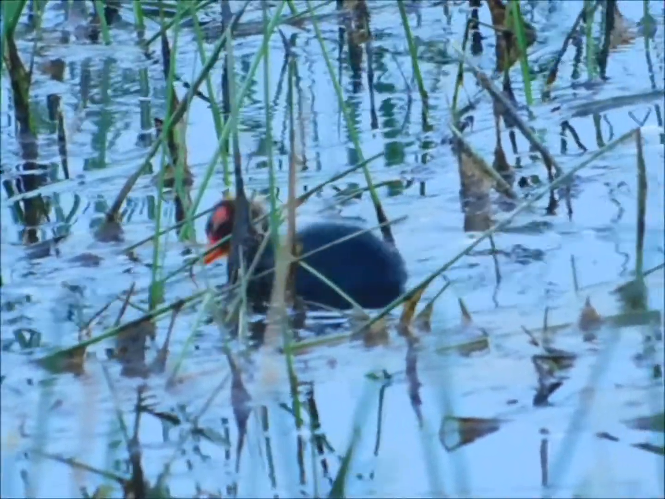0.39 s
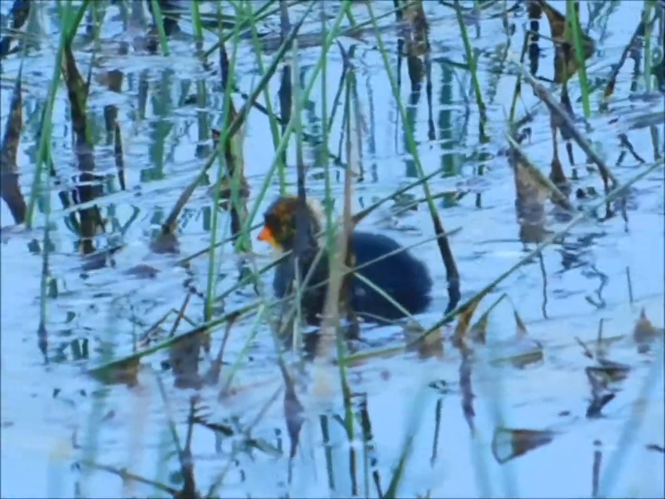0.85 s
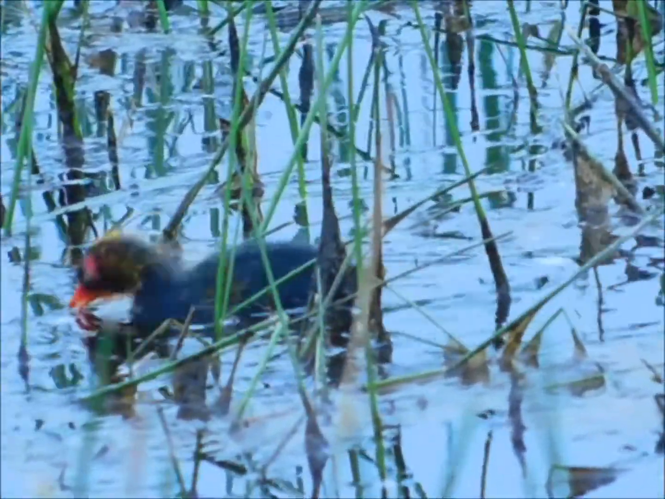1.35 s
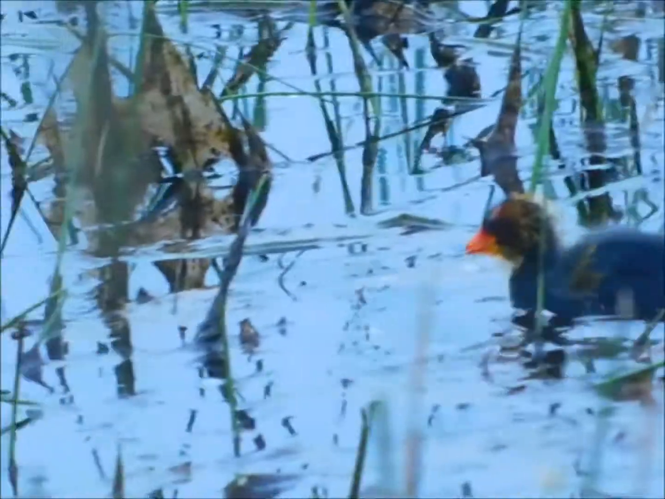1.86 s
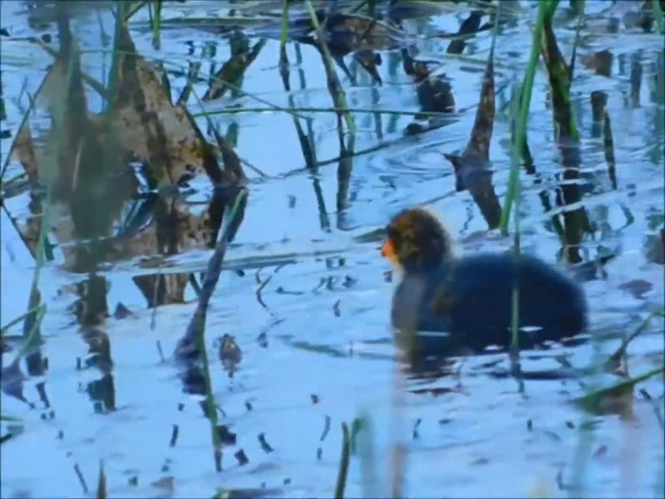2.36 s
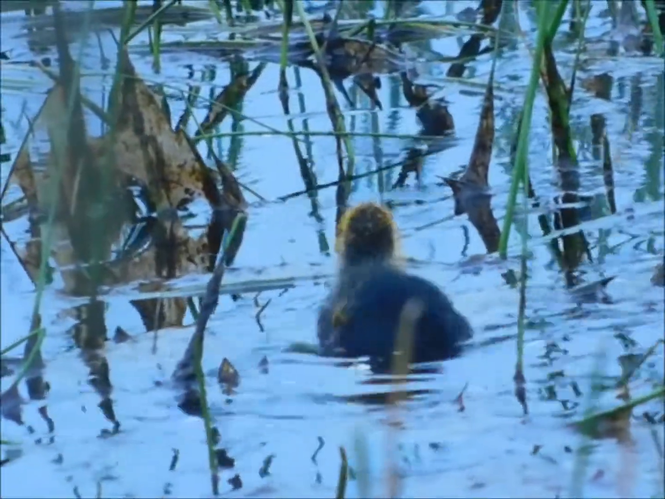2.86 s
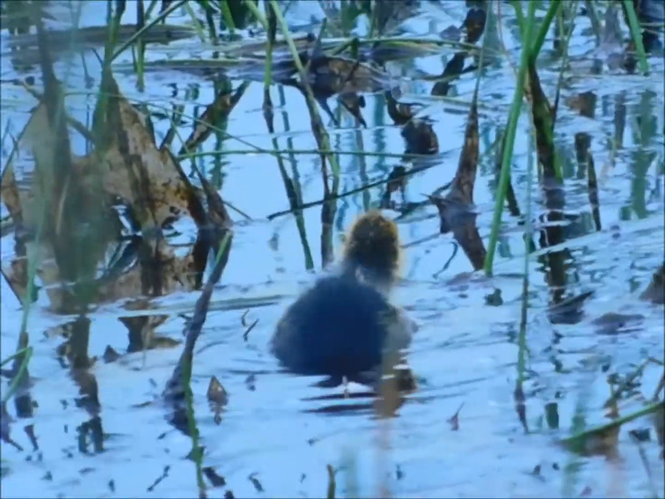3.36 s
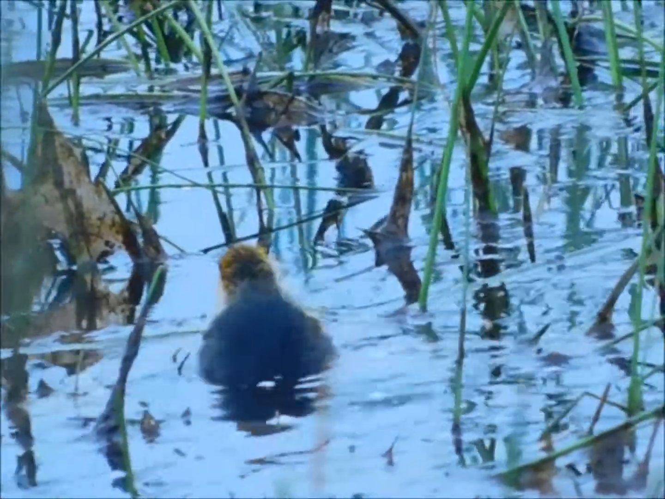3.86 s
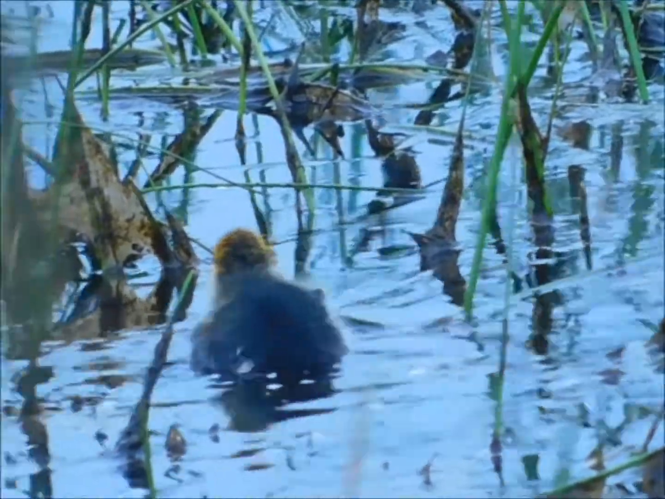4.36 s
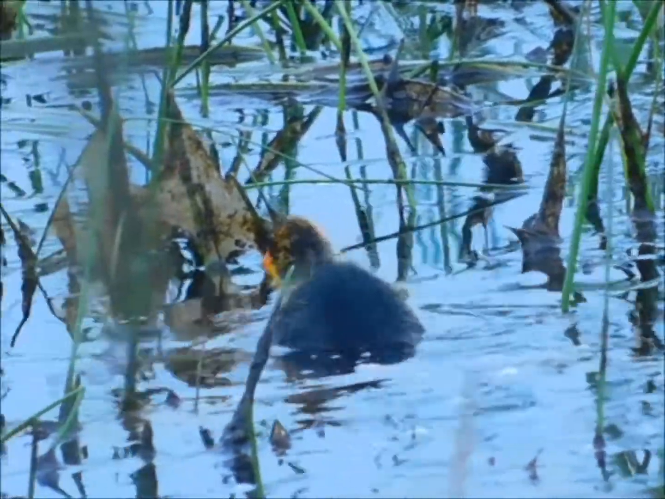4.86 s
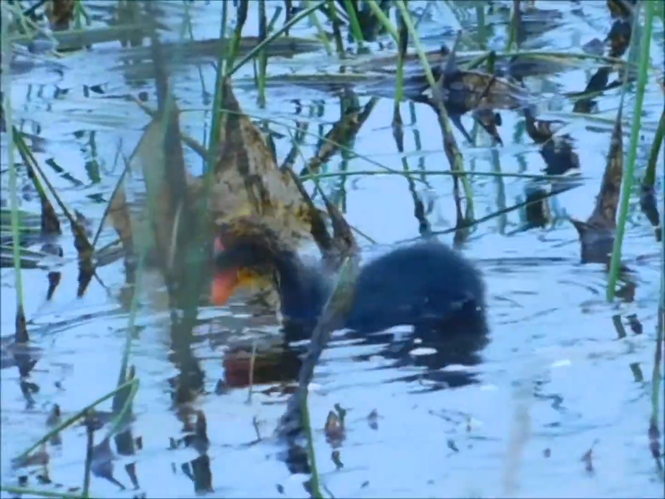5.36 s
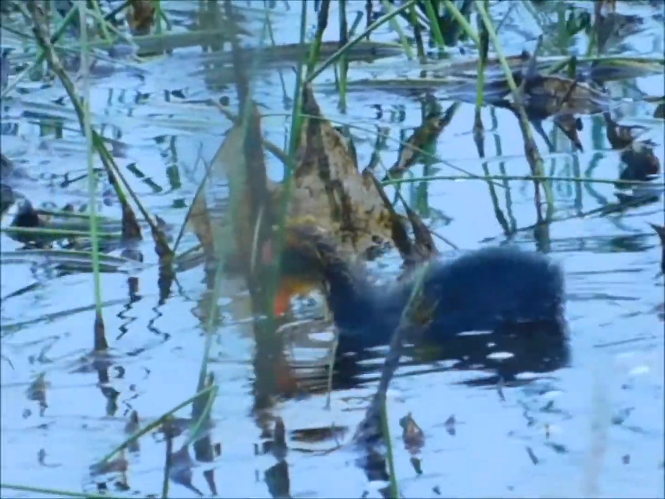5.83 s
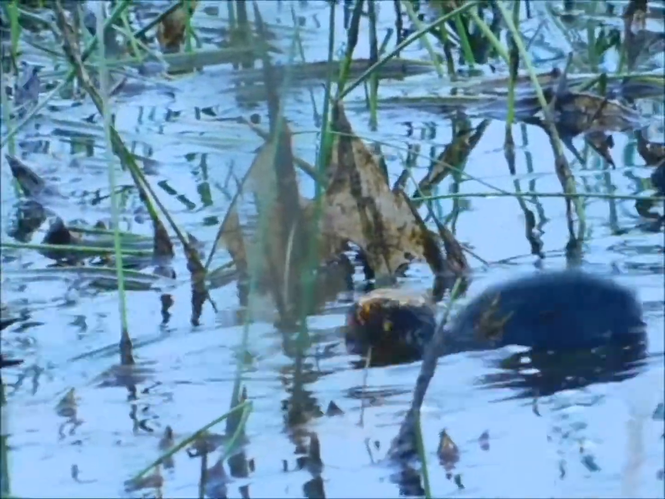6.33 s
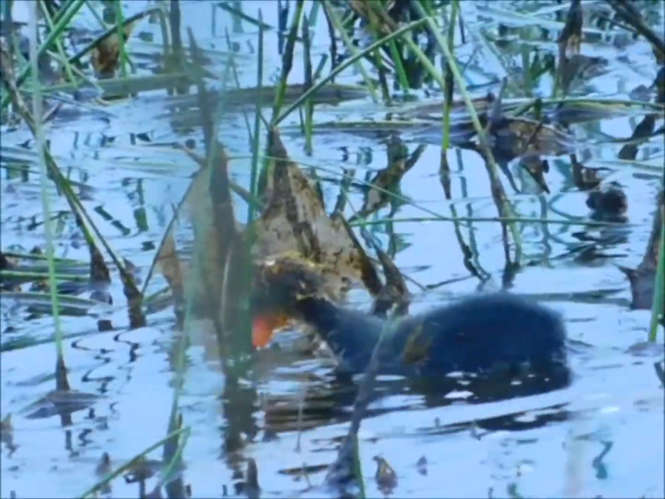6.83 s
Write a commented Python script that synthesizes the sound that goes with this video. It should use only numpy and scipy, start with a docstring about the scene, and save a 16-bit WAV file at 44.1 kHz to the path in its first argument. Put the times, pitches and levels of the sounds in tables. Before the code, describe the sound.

A young waterbird whistles high, arching peeps across open wetland, with brief buzzy and reedy adult calls, sharp close clicks and occasional bubbling plips.

```python
"""Waterbird chicks over a reed marsh

Chicks peep in gliding sines, thin and arching, while two grown birds give a buzzy and a reedy call. A far
chorus hums as narrow noise bands under an open-air hush of coloured noise. A small hard object on the right
clicks through ringing modes; puffs of filtered grains rustle on the left; soft dull taps and one low thud sound
as rising sines, and a faint high sine pip settles into a beat of six tenths of a second."""
import sys
import numpy as np
from scipy import signal
from scipy.fft import rfft, irfft
from scipy.io import wavfile
from scipy.ndimage import uniform_filter1d

SR = 44100
rng = np.random.default_rng(int(sys.argv[2]) if len(sys.argv) > 2 else 0)


def field_ratio(decibels):
    """Amplitude ratio for a level in dB (20 dB per decade); scalars and array-likes work."""
    return 10 ** (np.asarray(decibels, dtype=float) / 20)


def dump(signal):
    """Clip the signal to [-1, 1] and save it as 16-bit WAV at the path in sys.argv[1]."""
    limited = np.clip(np.atleast_2d(signal).T, -1, 1)
    pcm = np.round(limited * 32767).astype(np.int16)
    wavfile.write(sys.argv[1], SR, pcm)


N = 306934   # samples in the scene


def unit(x):
    """Scale to rms 1."""
    return x / np.sqrt(np.mean(x ** 2) + 1e-20)


def drift(rate_hz, size=N):
    """Slow random wander of rms 1: noise through two equal one-pole lowpasses."""
    r = np.exp(-2 * np.pi * rate_hz / SR)
    noise = rng.standard_normal(size + 4000)
    return unit(signal.lfilter([1], [1, -2 * r, r * r], noise)[4000:])   # drop the filter's start


def resonance(x, hz, width_hz):
    """Two-pole band with gain 1 on top."""
    r = np.exp(-np.pi * width_hz / SR)
    feedback = [1, -2 * r * np.cos(2 * np.pi * hz / SR), r * r]
    return signal.lfilter([(1 - r * r) / 2, 0, (r * r - 1) / 2], feedback, x)


def ring(clicks, hz, t60):
    """A unit click sets a decaying sine of starting height 1 ringing."""
    r, w = field_ratio(-60 / (t60 * SR)), 2 * np.pi * hz / SR
    return signal.lfilter([0, np.sin(w)], [1, -2 * r * np.cos(w), r * r], clicks + 1e-18)


def place(x, pan_db, lag):
    """Left-minus-right level, and a lag in samples of the left port behind the right."""
    left = field_ratio(pan_db / 2) * np.roll(x, lag)
    right = field_ratio(-pan_db / 2) * x
    return np.array([left, right])


def voice(rows, overtones, waver_db, flutter=0, haze=0):
    """A gliding stack of sines with rounded arches and soft ends, wavering in pitch and level.
    A fourth column (beats per s) chops it into pulses; haze is the noise share blurring partials over 3 kHz."""
    s, *columns = np.transpose(rows)
    at = np.arange(round(s[0] * SR), round(s[-1] * SR))
    size = len(at)
    longest = SR // 3   # samples in the longest call
    hz, db, *chop = [np.interp(at / SR, s, c) for c in columns]
    for _ in range(2):   # round the corners of the glide
        hz = uniform_filter1d(hz, size=1 + min(size // 10, 600), mode="nearest")
    wavering_hz = hz * (1 + .002 * drift(120, size=longest)[:size])
    phase = 2 * np.pi * np.cumsum(wavering_hz) / SR
    wavering_db = db + waver_db * drift(69, size=longest)[:size]
    soft_ends = signal.windows.tukey(size, min(1, 350 / size))
    level = np.sqrt(2) * field_ratio(wavering_db) * soft_ends
    if chop:
        beat = 2 * np.pi * np.cumsum(chop[0]) / SR
        level = level * unit(1 + flutter * np.sin(beat))
        phase = phase + .15 * np.cos(beat)   # each beat also bends the phase, in radians
    out = np.zeros(N)
    for k, gain_db in overtones:
        blur = 1
        if haze and k * hz.mean() > 3000:
            blur = np.sqrt(1 - haze) + np.sqrt(haze) * drift(780, size=longest)[:size]
        out[at] += level * field_ratio(gain_db) * blur * np.sin(k * phase + k * k)
    return out


# Colour of the open air, before scaling: (f/Hz, level/dB per Hz)
HUSH_COLOUR = [(12, -37), (20, -3), (65, -2.5), (237, -10.5), (583, -8), (670, -5.5), (1280, -7.5),
               (1900, -7), (2060, -6), (2660, -12), (4160, -20), (7300, -27), (12100, -29.5), (15200, -29),
               (16500, -57)]
# How alike left and right are: (f/Hz, likeness from -1 to 1)
HUSH_LIKENESS = [(60, 0.96), (180, 0.29), (550, 0.33), (1650, 0.22), (4970, -0.17), (15000, 0.23)]


def hush():
    """Open-air noise, nearly the same on both sides in the deep bass and only loosely related above."""
    log_hz = np.log(np.maximum(np.fft.rfftfreq(N + 266, 1 / SR), 1))
    colour_hz, colour_db = np.transpose(HUSH_COLOUR)
    like_hz, likeness = np.transpose(HUSH_LIKENESS)
    colour = field_ratio(np.interp(log_hz, np.log(colour_hz + 1), colour_db))
    alike = np.clip(np.interp(log_hz, np.log(like_hz), likeness), -1, 1)
    mid, side = rfft(rng.standard_normal((2, N + 266))) * colour
    both = irfft(np.sqrt(1 + alike) * mid + np.sqrt(1 - alike) * side * [[1], [-1]])[:, :N]
    level = field_ratio(-61 + .6 * drift(4.5))   # a slight wander in level
    return level * unit(both) * field_ratio([[.4], [-.4]])


# Bands of the far chorus: (f/Hz, width/Hz, level/dB, left minus right/dB)
CHORUS_BANDS = [(577, 85, -75.5, -2.5), (763, 18, -80, 11.5), (1303, 60, -69.5, 0), (1736, 13, -70.5, -2),
                (2031, 33, -69.5, 13.5)]


def chorus():
    """Many far voices blur into narrow throbbing noise bands; part of each is shared by both ports."""
    out = 0
    for hz, width_hz, db, pan_db in CHORUS_BANDS:
        pass_hz = width_hz * 1.64   # two such passes leave about the listed width
        noise = rng.standard_normal((3, N))
        shared, *own = resonance(resonance(noise, hz, pass_hz), hz, pass_hz)
        band = place(shared, 0, lag=-12) + 0.59 * np.array(own)
        side_db = pan_db * np.array([[.5], [-.5]])
        out = out + unit(band) * field_ratio(db + 1.1 * drift(27) + side_db)
    return out


# Overtones of a whistle: (multiple of the listed pitch, level/dB)
WHISTLE_OVERTONES = [(2, -29), (3, -28)]


def whistle(rows, waver_db, partials=3):
    """A nearly pure tone: a main partial at .98 of the listed pitch and faint overtones."""
    stack = [(0.98, 0.014)] + WHISTLE_OVERTONES
    return voice(rows, stack[:partials], waver_db)


def held(s, length, from_hz, to_hz, db):
    """A nearly level note that swells, holds, then fades at 100 dB per s."""
    share = np.array([0, .2, .4, 1])   # start, swollen, fade begins, end
    fade_db = 100 * length * (1 - .4)
    hz = from_hz + (to_hz - from_hz) * share
    return np.transpose([s + length * share, hz, db + np.array([-3, 0, 0, -fade_db])])


# Held whistles: (t/s, length/s, from f/Hz, to f/Hz, level/dB, left minus right/dB)
HELD_WHISTLES = [ (0., .06, 4100, 4150, -60, 5.5), (.15, .03, 4040, 4210, -64, 5.5),
                 (.64, .05, 3800, 3520, -72, .6), (.955, .035, 1110, 1110, -62, .6),
                 (1.036, .18, 1370, 1360, -57, .6), (1.39, .045, 5240, 5490, -76, .6),
                 (2.1, .04, 4970, 4900, -79, 5.5), (2.155, .03, 3090, 2820, -57, 5.5),
                 (2.3, .15, 3190, 3170, -57, 5.5), (2.49, .11, 1860, 1855, -60, .6),
                 (3.15, .08, 3190, 3200, -69, 5.5), (3.3, .1, 2120, 2200, -63, 5.5),
                 (3.64, .04, 3970, 3950, -67, .6), (4.72, .085, 1940, 1970, -65, 5.5),
                 (4.76, .04, 4150, 4210, -78, .6), (5.926, .014, 990, 1290, -57, .6), ]


def whistles():
    """Held whistles with a single overtone; the deep ones come from a bird nearer the middle."""
    out = np.zeros((2, N))
    for *row, pan_db in HELD_WHISTLES:
        lag = 3 if row[2] < 1900 else 9
        out += place(whistle(held(*row), waver_db=3, partials=2), pan_db, lag)
    return out


# A loud near chirp that dips, arches and drops away: (t/s, f/Hz, level/dB)
CHIRP_GLIDE = [(.086, 4280, -52), (.097, 4400, -48.5), (.108, 4355, -41.5), (.116, 4070, -47.5),
               (.121, 3020, -36.5), (.126, 2000, -55)]
# Its quick falling after-note: (t/s, f/Hz, level/dB)
AFTER_GLIDE = [(.12, 5850, -58), (.126, 4300, -52), (.133, 2900, -55)]


def chirp():
    """A short whistle sweeping down steeply, with a higher note falling over its end."""
    notes = whistle(CHIRP_GLIDE, waver_db=2.8) + whistle(AFTER_GLIDE, waver_db=2.8)
    return place(notes, 0.5, lag=10)


# Puffs of rustling: (t/s, level/dB before the rise, rise/s, t60/s)
RUSTLE_PUFFS = [(0.116, -37.5, 0.0072, 0.072), (0.261, -43, 0.01, 0.16), (.565, -57, 0.0013, 0.055),
                (1.49, -27, 0.007, 0.047), (1.608, -50.5, 0.0029, 0.24), (2.659, -44.5, 0.0048, 0.12),
                (4.2, -51, 0.0041, 0.11), (4.248, -50.5, 0.0052, 0.18)]
# Resonances that colour every puff: (f/Hz, width/Hz, relative level/dB)
RUSTLE_COLOUR = [(2200, 3300, 13), (4160, 1650, 32), (5320, 2000, -17.5), (9000, 1435, -55)]


def rustles():
    """Puffs of dense grains through broad resonances, stronger on the left."""
    t, level = np.arange(N) / SR, np.zeros(N)
    for s, db, rise, t60 in RUSTLE_PUFFS:
        age = np.maximum(t - s, 0)
        level += field_ratio(db - 60 * age / t60) * (1 - np.exp(-age / rise))
    grains = rng.standard_normal(N) * field_ratio(3.0 * drift(300))
    puff = unit(sum(field_ratio(db) * resonance(grains, hz, width) for hz, width, db in RUSTLE_COLOUR))
    dulled = unit(signal.lfilter([1], [1, -.45], puff))
    return place(level * dulled, 6.7, lag=4)


# The throat favours one pitch: (f/Hz, level/dB)
THROAT_CURVE = [(2800, -4), (4000, 0.), (5000, -5), (6400, -9), (8000, -13)]


def throat_db(hz):
    """Level change that the chick's throat gives a pitch."""
    return np.interp(hz, *np.transpose(THROAT_CURVE))


# Foot, knee, shoulder, crest, brow and end of a peep: (share of the length, effort level/dB)
PEEP_STAGES = [(0., -3), (.13, -3), (.36, 0.), (.6, -2), (.73, -3), (1, -2)]


def peep(s, length, knee_hz, shoulder_hz, crest_hz, db):
    """Quick rise to a knee, a shoulder, a leap to the crest and a steep fall."""
    share, effort_db = np.transpose(PEEP_STAGES)
    foot_hz, brow_hz, end_hz = 3200, .92 * crest_hz, 2850
    hz = np.array([foot_hz, knee_hz, shoulder_hz, crest_hz, brow_hz, end_hz])
    return np.transpose([s + length * share, hz, db + effort_db + throat_db(hz)])


# Arching peeps of a chick ahead: (t/s, length/s, knee f/Hz, shoulder f/Hz, crest f/Hz,
# level/dB before effort and throat)
CHICK_PEEPS = [ (.238, .107, 4160, 3870, 6190, -63), (.42, .09, 3550, 3660, 5430, -62),
               (.85, .13, 5000, 6000, 6400, -69), (1.028, .114, 4000, 4030, 6400, -62),
               (1.185, .1, 4520, 3940, 6470, -63), (1.665, .145, 4700, 6200, 6260, -68),
               (1.855, .115, 4390, 4900, 6400, -68), (2.885, .115, 4000, 4700, 4960, -71),
               (3.345, .135, 4700, 5800, 6300, -69), (3.53, .11, 4180, 4050, 5850, -65),
               (3.705, .1, 4340, 3980, 5830, -66), (3.9, .095, 3700, 3850, 5150, -67),
               (4.41, .14, 4900, 6100, 6200, -70), (4.62, .125, 4200, 5090, 6300, -70),
               (4.8, .11, 4250, 4250, 7600, -69), (5.17, .12, 4700, 4900, 6900, -70),
               (5.455, .115, 4280, 4750, 6790, -68), (5.645, .105, 4050, 4450, 7160, -64),
               (5.98, .12, 4500, 5600, 6440, -70), (6.19, .095, 3900, 4500, 5360, -72), ]


def peeps():
    """A chick ahead whistles one arch after another."""
    return place(sum(whistle(peep(*row), waver_db=2.8) for row in CHICK_PEEPS), 0.5, lag=10)


# Buzzy call: (t/s, f/Hz, level/dB, flutter beats per s)
BUZZY_GLIDE = [(.338, 1640, -57, 90), (.35, 1711, -51.5, 141), (.379, 1765, -47.5, 150),
               (.415, 1760, -46, 168), (.483, 1735, -47.5, 188), (.5, 1740, -57, 195)]
# Its partials: (multiple of the pitch, level/dB)
BUZZY_PARTIALS = [(1, 0), (2, -29), (3, -28), (4, -27)]


def buzzy_call():
    """A grown bird's whistle chopped by a quickening flutter, with hazy overtones, on the left."""
    return place(voice(BUZZY_GLIDE, BUZZY_PARTIALS, waver_db=2, flutter=.75, haze=.8), 9.0, lag=-7)


# Contacts of the hard object: (t/s, strength/dB, brightness/dB per octave, left minus right/dB)
CONTACTS = [ (.5267, -27, -2, -8), (.5614, -4.5, -3, -3.5), (1.0324, -26.5, -9, -5),
            (1.0408, -33.5, -5, -1), (1.4437, -17.5, -5.5, -7), (1.4795, -14.5, 6.5, -9),
            (1.482, -3.5, -1, -6), (1.4876, -6.5, 1.5, -4.5), (1.494, -6.5, -1.5, -1.5),
            (1.871, -55, 7, -2), (3.0444, -29.5, -5.5, -10), (3.0636, -18.5, -0.5, -6.5),
            (3.7415, -34.5, -8, 0), (4.15, -52.5, -1.5, 14), (4.19, -3.5, 0.5, -5.5),
            (4.1953, -4, -2.5, -4.5), (4.8518, -32, -4, -3.5), (6.174, -38.5, -5, -6), ]
# Modes of the clicking object: (f/Hz, relative level/dB, t60/s)
BODY_MODES = [ (1236, -27.5, 0.16), (2380, -17, 0.11), (753.5, -28.5, 0.09), (1210, -32.5, 0.18),
              (1382, -6, 0.021), (1593, -2, 0.028), (1980, -15.5, 0.067), (2166, 6, 0.0077),
              (2330, -4, 0.029), (2825, -4.5, 0.016), (3450, 6.5, 0.0094), (4070, 6.5, 0.0042),
              (4610, 4, 0.0074), (5540, -1, 0.0082), (8400, -15, 0.0061), (11560, -9, 0.0075), ]


def clicks():
    """Each contact starts all modes nearly in step, mostly nearer the right port; the left hears them late.
    It bounces once, softer and duller; parts chatter on as bright grit, and little bass is sent out."""
    first = np.array(CONTACTS)
    # rebound: about 4.9 ms later, 8 dB softer, 9 dB per octave duller, each varied at random
    rebound = [0.0049, -8, -9, 0] * (1 + .2 * rng.uniform(-1.1, 1, first.shape))
    s, strength_db, bright, pan_db = np.concatenate([first, first + rebound]).T
    at = np.round(s * SR).astype(int)
    out = np.zeros((2, N))
    scatter_db = 3.0 * rng.normal(0, 1, (len(s), len(BODY_MODES), 2))
    late = rng.integers([4, 0], [30, 12], (len(s), len(BODY_MODES), 2))   # samples: left, right
    for k, (hz, db, t60) in enumerate(BODY_MODES):
        blow = np.zeros((2, N))
        mode_db = strength_db - 15.5 + db + bright * np.log2(hz / 2000)
        blow[1, at + late[:, k, 1]] = field_ratio(mode_db + scatter_db[:, k, 1])
        blow[0, at + late[:, k, 0]] = field_ratio(mode_db + pan_db + scatter_db[:, k, 0])
        out += ring(blow, hz, t60)
    touch = np.zeros((2, N))
    touch[:, at] = field_ratio(strength_db - 19.5 + 2.2 * bright + pan_db * [[1], [0]])
    decay = field_ratio(-60 / (0.022 * SR))   # chatter dies by 60 dB in 22 ms
    chatter = signal.lfilter([1], [1, -decay], uniform_filter1d(touch, size=31) + 1e-18)
    grit = rng.standard_normal((2, N)) * field_ratio(4.0 * drift(500))
    bright_band = signal.butter(2, [3000, 13000], "band", fs=SR, output="sos")
    out += signal.sosfilt(bright_band, chatter * grit)
    small_body = signal.butter(2, 900, "high", fs=SR, output="sos")
    return signal.sosfilt(small_body, out)


# Reedy call: (t/s, base f/Hz, level/dB)
REEDY_GLIDE = [(.75, 503, -50), (.758, 550, -52), (.77, 602, -45), (.785, 617, -45), (.83, 625, -43),
               (.866, 628, -44), (.877, 630, -53)]
# Its partials; a second, slightly sharp tone carries the third and its mixtures:
# (multiple of the base pitch, level/dB)
REEDY_PARTIALS = [(3.05, 0), (4, -5), (6.1, -25), (7, -27), (9.1, -34), (10, -22), (12, -38), (13, -32),
                  (16, -38)]


def reedy_call():
    """A grown bird's call made of upper partials alone, the base pitch left out, on the left."""
    return place(voice(REEDY_GLIDE, REEDY_PARTIALS, waver_db=1.8, haze=.18), 7.3, lag=-6)


def slide(s, length, from_hz, to_hz, db):
    """A slightly bowed glide, .46 of the way at half time."""
    hz = from_hz + (to_hz - from_hz) * np.array([0, .46, 1])
    return np.transpose([s + length * np.array([0, .5, 1]), hz, db + throat_db(hz)])


# Bare upward slides of a chick on the left: (t/s, length/s, from f/Hz, to f/Hz, level/dB before the throat)
CHICK_SLIDES = [ (.985, .035, 3400, 4410, -74), (1.355, .035, 3030, 5200, -73),
                (2.065, .035, 3000, 5090, -73), (2.137, .033, 4900, 6170, -74),
                (2.29, .06, 3580, 5900, -75), (2.74, .045, 5360, 7700, -69), (3.23, .03, 2550, 2840, -61),
                (3.31, .07, 4960, 8000, -71), (3.49, .03, 4500, 6800, -70), (4.005, .06, 5300, 7600, -68),
                (4.1, .03, 3220, 4070, -71), (4.72, .07, 5440, 6930, -68), (5.08, .06, 2290, 2850, -63),
                (5.09, .07, 3230, 5830, -76), (6.39, .11, 2910, 6900, -74), ]


def slides():
    """A chick on the left whistles short glides."""
    return place(sum(whistle(slide(*row), waver_db=3.2) for row in CHICK_SLIDES), 5.5, lag=9)


# Two pips before the beat settles: (t/s, length/s)
FIRST_PIPS = [(1.076, .026), (1.68, .049)]


def pips():
    """A faint, very high gated sine, steady after two early pips and stronger on the left."""
    t = np.arange(N) / SR
    first_s, period_s, length_s = 2.261, .6004, .023
    beat = FIRST_PIPS + [(first_s + k * period_s, length_s) for k in range(8)]
    gate = sum((t > s) & (t < s + length) for s, length in beat) * 1.
    soft_gate = uniform_filter1d(gate, size=90)
    tone = np.sin(2 * np.pi * 11680 * t)
    return place(field_ratio(-76.5) * soft_gate * tone, 11.0, lag=0)


# Soft dull taps and one low thud: (t/s, level/dB before the swell, starting f/Hz, t60/s)
SOFT_TAPS = [(1.655, -45, 302, .044), (2.544, -53, 2310, .07), (2.576, -49, 1600, .06),
             (2.605, -43, 1700, .06), (4.905, -49, 1344, .07), (4.988, -45, 1580, .05),
             (5.008, -45, 1700, .04), (5.021, -41, 1650, .04), (5.031, -43, 1600, .05),
             (6.112, -51, 2380, .04), (6.153, -47, 1460, .068), (6.172, -45, 1570, .057)]


def taps():
    """Each tap swells in a few milliseconds, rings briefly and rises in pitch amid a little noise."""
    out, age = np.zeros(N), np.arange(SR // 10) / SR
    for s, db, hz, t60 in SOFT_TAPS:
        swell = (1 - np.exp(-age / 0.003)) * field_ratio(db - 60 * age / t60)
        noise = rng.standard_normal(len(age))
        hiss = unit(resonance(resonance(noise, 1.15 * hz, .8 * hz), 1.15 * hz, .8 * hz))
        ringing = np.sin(2 * np.pi * hz * age * (1 + 3.0 * age))
        out[round(s * SR):][:len(age)] += swell * (ringing + .7 * hiss)
    return place(out, -.6, lag=3)


def scattered(calls):
    """Direct calls plus a diffuse tail scattered by reeds and water: decaying noise, unrelated left and right."""
    age = np.arange(SR // 2) / SR
    decay = field_ratio(-60 * age / .4) * (age > .008)   # t60 .4 s, starting after 8 ms
    tail = unit(rng.standard_normal((2, len(age))) * decay)
    wet = signal.fftconvolve(calls.mean(axis=0, keepdims=True), tail, axes=1)[:, :N]
    return calls + wet * field_ratio(-12) / np.sqrt(len(age))


def birds():
    """Every near call, direct and scattered."""
    return scattered(whistles() + chirp() + peeps() + buzzy_call() + reedy_call() + slides())


def scene():
    """All sources at the two ports."""
    return hush() + chorus() + birds() + rustles() + clicks() + pips() + taps()


def top_cut(x):
    """Nothing passes above the cut-off."""
    return signal.sosfilt(signal.butter(12, 17160, fs=SR, output="sos"), x)


def record(dry):
    """The finished mix goes out as it is at the two ports."""
    return top_cut(dry)


dry = scene()
out = record(dry)
dump(out)
```